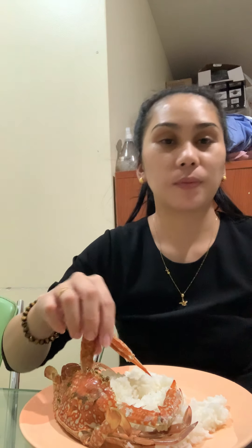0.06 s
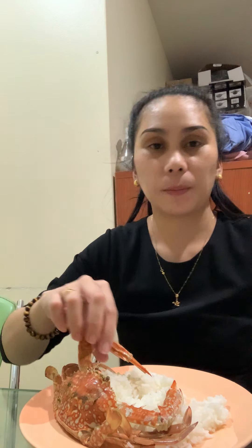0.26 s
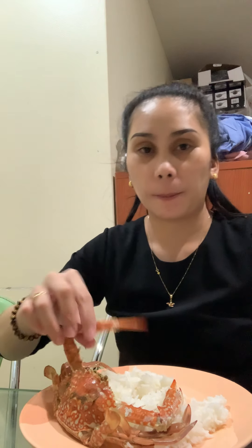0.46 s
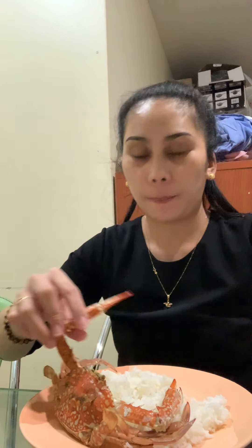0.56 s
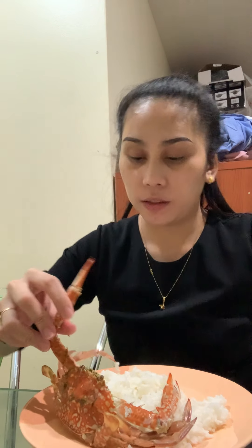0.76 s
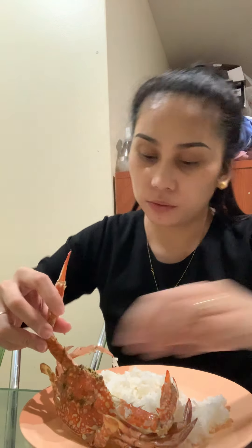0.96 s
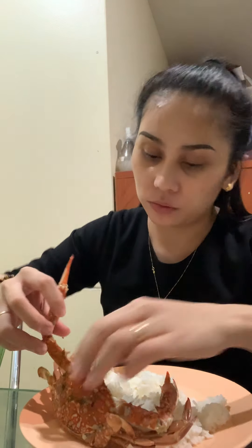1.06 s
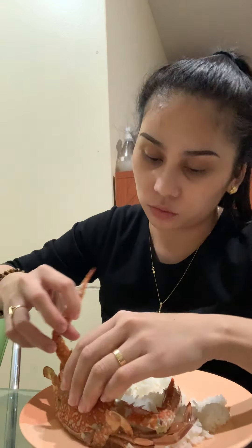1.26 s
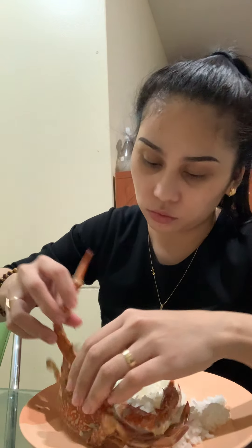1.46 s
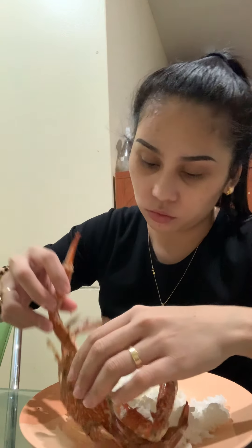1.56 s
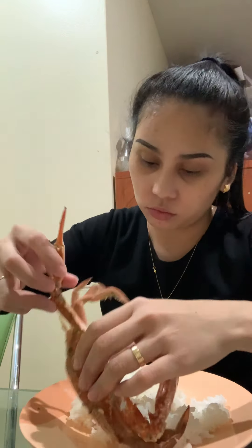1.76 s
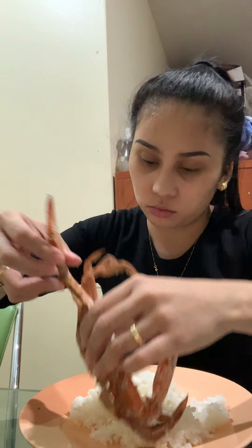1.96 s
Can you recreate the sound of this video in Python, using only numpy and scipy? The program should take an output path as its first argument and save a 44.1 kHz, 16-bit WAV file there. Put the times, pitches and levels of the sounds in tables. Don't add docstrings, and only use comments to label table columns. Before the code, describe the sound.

A hard crab shell knocks sharply twice on a plate and table, with short room echo; then quiet shell snaps and faint scuffs of fingers over low room rumble, close microphone with soft hiss.

```python
import sys
import numpy as np
from scipy import signal
from scipy.fft import rfft, irfft
from scipy.io import wavfile

SR = 44100
rng = np.random.default_rng(int(sys.argv[2]) if len(sys.argv) > 2 else 0)


def rack_gain(trim_db):
    fader = np.asarray(trim_db, float)
    return 10 ** (fader / 20)


def master(y):
    cut = np.clip(np.atleast_2d(y).T, -1, 1)
    pcm = np.round(cut * 32767)
    wavfile.write(sys.argv[1], SR, pcm.astype(np.int16))


N = 88200

# time in seconds, level in dB, softness low-pass in Hz.
FIRST_KNOCK = [
    (.2470, -21.5, 14030),
    (.2490, -26, 2509),
    (.2520, -39.5, 4000),
    (.2615, -30.5, 7890),
]
SECOND_KNOCK = [
    (.5722, -29.5, 3500),
    (.5748, -23.5, 15100),
    (.5785, -30, 3000),
    (.6005, -32, 8000),
]
# frequency in Hz, density in dB per Hz.
FIRST_COLOUR = [(230, -10.5), (400, 1), (1000, 2), (2100, 2), (3100, -3.5), (4500, -12), (7200, -17.5),
                (15000, -41.5)]
SECOND_COLOUR = [(60, -23), (200, -14.5), (400, 2), (1000, -2), (2200, 0), (5000, -2), (9000, -9.5),
                 (15000, -15.5)]
BODY_HZ = [72, 125, 348, 457, 700, 840, 960, 1163, 1326, 1525, 2090, 2200, 3160, 3550]
# level in first knock in dB, level in second knock in dB, T60 in seconds.
BODY = [(-18, -25.5, 0.24), (-25, -25, 0.25), (-14.5, -14, 0.21), (-7, -18, 0.12), (-13, -15, 0.2),
        (-14, -15.5, 0.2), (-6.5, -4, 0.11), (-10, -15, 0.14), (-16.5, -8.5, 0.089), (-4.5, -5.5, 0.075),
        (3, 1, 0.019), (-13.5, -11, 0.06), (-9, -9.5, 0.054), (-9.5, -11.5, 0.039)]
# frequency in Hz, first and second knock levels in dB, T60 in seconds.
TABLE = [(209, -30.5, -29, 0.16), (296.6, -21.5, -23.5, .4), (420.5, -18, -21, 0.37),
         (638, -19.5, -26.5, 0.3), (1100, -15, -19, 0.11), (1636, -17, -20.5, 0.18), (2680, -13, -21, 0.11),
         (4600, -22, -14.5, 0.049)]
BODY_DB, THUD_DB = -1.5, 21
SPREAD_S_AT_1K = 0.002047


def knock(contacts, colour, column):
    thud, modes = np.zeros(N), np.zeros(N)
    shape = dispersed(causal_colour(colour))
    for s, db, cut_hz in contacts:
        soft = signal.butter(2, min(cut_hz, 18000), fs=SR, output="sos")
        strength = rack_gain(rng.normal(0, 2, len(BODY))) * rng.choice([-1, 1], len(BODY))
        force = signal.sosfilt(soft, impulse(s, db) * rng.choice([-1, 1]))
        thud += rack_gain(THUD_DB) * signal.fftconvolve(force, shape)[:N]

        push = signal.sosfilt(soft, impulse(s + SPREAD_S_AT_1K / 2, db))
        for gain, hz, mode in zip(strength, BODY_HZ, BODY):
            modes += rack_gain(BODY_DB) * gain * rack_gain(mode[column]) * ring(push, hz, mode[2])
        for sign, mode in zip(rng.choice([-1, 1], len(TABLE)), TABLE):
            modes += sign * rack_gain(mode[column + 1]) * ring(push, mode[0], mode[3])
    return np.array([thud, band_pass(modes, 40, 5500)])


def dispersed(shape):
    hz = np.fft.rfftfreq(len(shape), 1 / SR)
    delay = SPREAD_S_AT_1K * np.maximum(np.sqrt(1000 / np.maximum(hz, 100)) - .3, 0) + .0003
    phase = 2 * np.pi * np.cumsum(delay) * hz[1]
    return irfft(rfft(shape) * np.exp(-1j * phase), len(shape))


# peak in seconds, level in dB, frequency in Hz.
FORERUNNERS = [
    (0.2485, -32.5, 1497),
    (0.568, -50.5, 1570),
]
FORERUN_S = 0.0039


def forerunners():
    t, out = np.arange(N) / SR, np.zeros(N)
    for s, db, hz in FORERUNNERS:
        swell = np.exp(-np.abs(t - s) / FORERUN_S)
        out += rack_gain(db) * swell * rms_one(ring(rng.standard_normal(N), hz, .006))
    return out


# time in seconds, energy in dB, low edge in Hz, high edge in Hz.
TICKS = [(0.2472, -9, 1480, 4750), (0.2474, -13, 6700, 8600), (.2473, -24.5, 8500, 16900),
         (0.2607, -17, 6450, 7850), (0.348, -34, 4000, 9000), (0.552, -65, 4970, 13900),
         (0.5722, -26.5, 4000, 15000), (0.5751, -10.5, 7740, 13300), (0.577, -3.5, 4340, 7100),
         (0.5751, 1.5, 1500, 3600), (0.6, -11.5, 2970, 7700), (1.085, -50, 3470, 6500),
         (1.2480, -53.5, 2500, 8000), (1.6187, -35.5, 900, 6000), (1.6187, -49, 6460, 9500),
         (1.7480, -46.5, 4656, 7480), (1.7484, -57.5, 7420, 13000), (1.982, -50, 3500, 6500),
         (1.98, -54.5, 6550, 13500), (.2520, -21, 3000, 4600), (0.572, -12, 1100, 2500),
         (1.082, -46, 1010, 3400), (1.6190, -42, 4400, 6000)]
TICK_ECHO_S, TICK_ECHO_DB = .0009, -3


def dry_ticks():
    out = np.zeros((2, N))
    for s, db, lo_hz, hi_hz in TICKS:
        echo_s = s + TICK_ECHO_S * rng.uniform(0.82, 0.89)
        pair = np.array([impulse(s, db), -impulse(echo_s, db + TICK_ECHO_DB)])
        out += band_pass(pair, lo_hz, hi_hz)
    return out


# time in seconds, peak in dB, ring in Hz, second ring in Hz, T60 in seconds.
CLICKS = [(0.2273, -71, 1420, 2920, 0.0066), (1.0835, -43, 2137, 932, 0.035),
          (1.0859, -49.5, 2680, 3060, 0.024), (1.0832, -60, 5800, 4100, 0.01),
          (1.0850, -52, 392, 636, 0.072), (1.2485, -63.5, 3060, 4100, 0.012),
          (1.6190, -41, 3970, 2494, 0.011), (1.6185, -55, 1444, 3240, 0.019),
          (1.6219, -51, 1070, 2050, 0.013), (1.7485, -58.5, 6500, 5270, 0.0075),
          (1.6320, -51, 3700, 2460, 0.0071), (1.7844, -65.5, 2350, 3430, 0.019)]
SECOND_RING_DB, SNAP_DB, SNAP_S = -4, 11.5, .0004


def clicks():
    ticks, rings = np.zeros(N), np.zeros(N)
    for s, db, hz, hz2, t60 in CLICKS:
        hit = impulse(s, db)
        lo_hz, hi_hz = min(hz, hz2) / 1.25, max(hz, hz2) * 1.2
        two_modes = ring(hit, hz, t60) + rack_gain(SECOND_RING_DB) * ring(hit, hz2, t60)
        rings += band_pass(two_modes, lo_hz, hi_hz)
        ticks += band_pass(burst(s, db + SNAP_DB, SNAP_S), lo_hz, hi_hz)
    return ticks, rings


def burst(s, db, length):
    x, n = np.zeros(N), np.arange(400)
    puff = rng.standard_normal(len(n)) * np.exp(-n / (length * SR))
    start = int(s * SR)
    x[start:start + len(n)] = rack_gain(db) * puff / np.sqrt(np.sum(puff ** 2))
    return x


# start in seconds, length in seconds, level in dB, centre in Hz.
SCUFFS = [(0.991, 0.012, -67, 1460), (1.004, 0.013, -59, 810), (0.995, 0.074, -64.5, 500),
          (0.88, 0.07, -80, 2500), (1.13, 0.049, -73, 700), (1.2, 0.041, -68, 2340),
          (1.095, 0.043, -64.5, 790), (0.996, 0.076, -70.5, 2700), (1.014, 0.019, -79, 9000),
          (1.081, 0.051, -76, 6100), (1.81, 0.04, -65.5, 940), (1.828, 0.08, -74, 1020),
          (1.636, 0.067, -87, 3200), (1.639, 0.034, -77, 1900), (1.78, 0.03, -73, 2800)]
GRAINS_PER_S, GRAIN_SPREAD_DB = 6000, 2.2
SCUFF_OCTAVES = 0.39


def scuffs():
    out, t = np.zeros(N), np.arange(N) / SR
    slips = rng.random(N) < GRAINS_PER_S / SR
    grains = slips * rack_gain(GRAIN_SPREAD_DB * rng.exponential(1, N)) * rng.choice([-1, 1], N)
    for s, length, db, hz in SCUFFS:
        edges = np.minimum(hz * 2. ** (np.array([-1, 1]) * SCUFF_OCTAVES), .45 * SR)
        band = signal.butter(2, edges, "band", fs=SR, output="sos")
        u = np.clip((t - s) / length, 0, None)
        stroke = np.minimum(4.6 * u, 1) * np.exp(-1.2 * u ** 2)
        out += rack_gain(db) * stroke * rms_one(signal.sosfilt(band, grains))
    return out


# frequency in Hz, T60 in seconds.
ROOM_T60 = [(60, 0.64), (160, 0.78), (420, 0.64), (1100, 0.48), (2900, 0.45), (7000, 0.42), (11000, 0.28),
            (16000, 0.13)]
ROOM_GAP_S, ROOM_BUILD_S = 0.0012, 0.001


def room_response():
    t = np.maximum(np.arange(SR) / SR - ROOM_GAP_S, 0)
    decay = bands(lambda hz: rack_gain(-60 * t / at_hz(ROOM_T60, hz)), SR)
    tail = (1 - np.exp(-t / ROOM_BUILD_S)) * decay
    return tail / np.sqrt(np.sum(tail ** 2))


# time in seconds, level in dB.
RUMBLE = [(0.0, -67), (0.16, -64.5), (0.48, -62), (1.28, -63), (1.46, -68.5), (1.61, -64.5), (2.0, -67.5)]
# frequency in Hz, density in dB per Hz.
RUMBLE_COLOUR = [(18, -49), (30, -8), (102, -5), (257, -10), (298, -13.5), (431, -9.5), (500, -21),
                 (528, -17), (2500, -48), (3250, -83.5), (5500, -120)]


def rumble():
    s, db = np.transpose(RUMBLE)
    shared = drift(12.0)
    noise = bands(lambda hz: rack_gain(at_hz(RUMBLE_COLOUR, hz) + 0.96 * shared + 1.7 * drift(19.0)), N)
    return rack_gain(np.interp(np.arange(N) / SR, s, db)) * rms_one(noise)


TONE_HZ = [98, 198, 301, 398, 500, 2708, 2778, 2850]
# rms level in dB, line width in Hz.
TONES = [(-70, 11), (-77, 5.8), (-79.5, 3), (-84, 6), (-82, 4.4), (-87.5, 12), (-87, 15), (-91.5, 14)]


def tones():
    t, out = np.arange(N) / SR, np.zeros(N)
    for hz, (db, width_hz) in zip(TONE_HZ, TONES):
        in_phase = (1 + drift(width_hz / 2)) * np.sin(2 * np.pi * hz * t)
        quadrature = drift(width_hz / 2) * np.cos(2 * np.pi * hz * t)
        out += rack_gain(db) * rms_one(in_phase + quadrature)
    return out


# frequency in Hz, density in dB per Hz.
HISS_COLOUR = [(600, -20), (1000, -4.5), (2000, -3.5), (4000, -4.5), (6000, -6.5), (9000, -11.5),
               (13000, -18.5), (16500, -35)]
HISS_DB = -82.5


def hiss():
    return rack_gain(HISS_DB) * rms_one(bands(lambda hz: rack_gain(at_hz(HISS_COLOUR, hz)), N))


def rms_one(x):
    return x / np.sqrt(np.mean(x ** 2) + 1e-20)


def at_hz(points, hz):
    p = np.array(points, float)
    return np.interp(np.log(np.maximum(hz, 1)), np.log(p[:, 0]), p[:, 1])


def impulse(s, db):
    x = np.full(N, 1e-18)
    x[int(s * SR)] = rack_gain(db)
    return x


def ring(x, hz, t60):
    r = rack_gain(-60 / (max(t60, .001) * SR))
    w = 2 * np.pi * min(hz, .45 * SR) / SR
    return signal.lfilter([0, np.sin(w)], [1, -2 * r * np.cos(w), r * r], x + 1e-18)


def band_pass(x, lo_hz, hi_hz):
    sos = signal.butter(3, [lo_hz, min(hi_hz, .45 * SR)], "band", fs=SR, output="sos")
    return signal.sosfilt(sos, x + 1e-18)


def causal_colour(points, size=4096):
    cep = irfft(np.log(rack_gain(at_hz(points, np.fft.rfftfreq(size, 1 / SR)))), size)
    cep[1:size // 2] *= 2
    cep[size // 2 + 1:] = 0
    return irfft(np.exp(rfft(cep)), size)


def bands(gain_for, size):
    edges = 28 * 2 ** np.arange(0, 9.4, 1 / 3)
    white = rng.standard_normal((2, size + 4000))
    out = np.zeros(size)
    for k, (lo, hi) in enumerate(zip(edges, edges[1:])):
        sos = signal.butter(2, [lo, hi], "band", fs=SR, output="sos")
        out += gain_for(np.sqrt(lo * hi)) * signal.sosfilt(sos, white[k % 2])[4000:]
    return out


def drift(rate):
    r = np.exp(-80 * np.pi * rate / SR)
    noise = rng.standard_normal(N // 40 + 2002)
    slow = signal.lfilter([1], [1, -2 * r, r * r], noise)[2000:]
    return np.interp(np.arange(N) / 40, np.arange(len(slow)), rms_one(slow - slow.mean()))


KNOCK_WET_DB, BODY_SEND_DB = 2.5, -10.5
CLICK_WET_DB, SNAP_SEND_DB, RING_SEND_DB = 6.5, -4, -17.5
SCUFF_WET_DB, TICK_WET_DB = -5, -13


def scene():
    floor = rumble() + hiss() + tones()
    room = room_response()
    first = knock(FIRST_KNOCK, FIRST_COLOUR, column=0)
    second = knock(SECOND_KNOCK, SECOND_COLOUR, column=1)
    thud, modes = first + second
    ticks, rings = clicks()
    rubs = scuffs()
    contact, rebound = dry_ticks()

    send = rack_gain(KNOCK_WET_DB) * (thud + rack_gain(BODY_SEND_DB) * modes)
    send += rack_gain(CLICK_WET_DB) * (rack_gain(SNAP_SEND_DB) * ticks + rack_gain(RING_SEND_DB) * rings)
    send += rack_gain(SCUFF_WET_DB) * rubs + rack_gain(TICK_WET_DB) * contact
    tail = signal.fftconvolve(send, room)[:N]

    direct = thud + modes + forerunners() + ticks + rings + rubs + contact + rebound
    return (direct + tail + floor)[None]


def low_pass(x):
    return signal.sosfilt(signal.butter(12, 16810, fs=SR, output="sos"), x)


def record(dry):
    bass_cut = signal.butter(4, 45, "high", fs=SR, output="sos")
    top_cut = signal.cheby2(12, 60, 16750, fs=SR, output="sos")
    mix = signal.sosfilt(top_cut, signal.sosfilt(bass_cut, dry))
    return low_pass(mix)


dry = scene()
out = record(dry)
master(out)
```